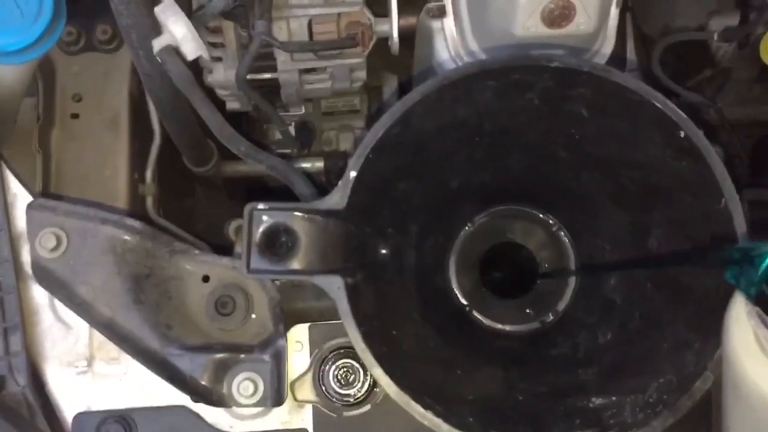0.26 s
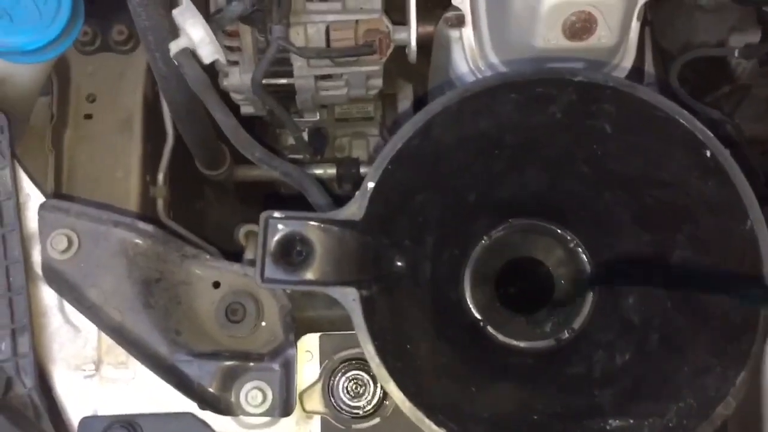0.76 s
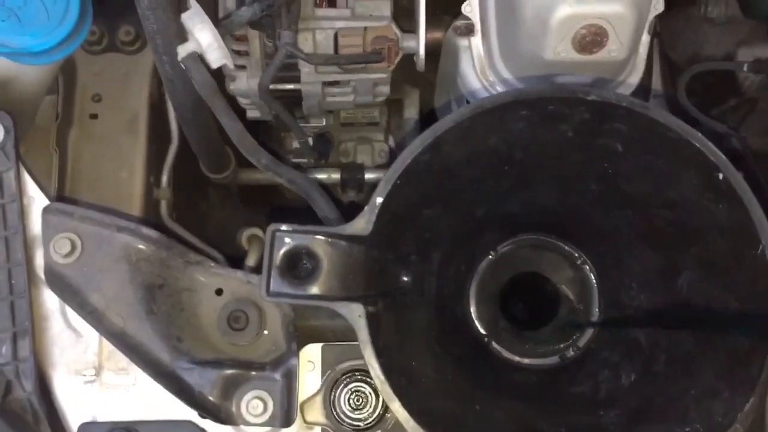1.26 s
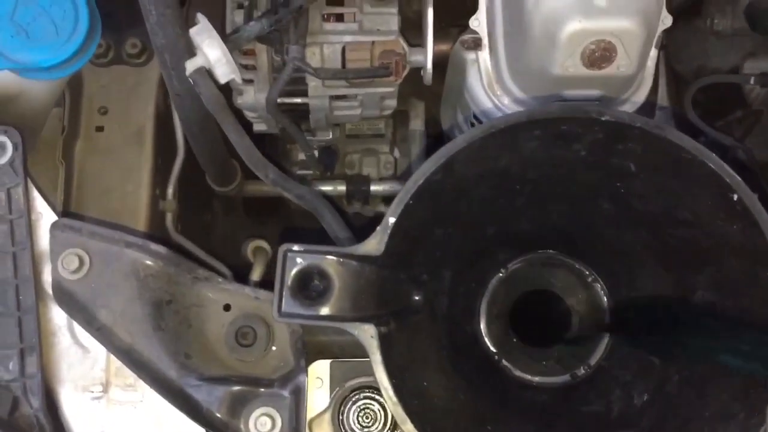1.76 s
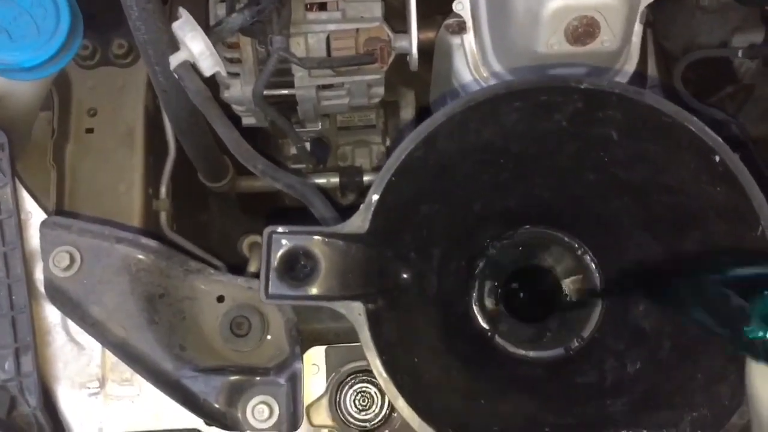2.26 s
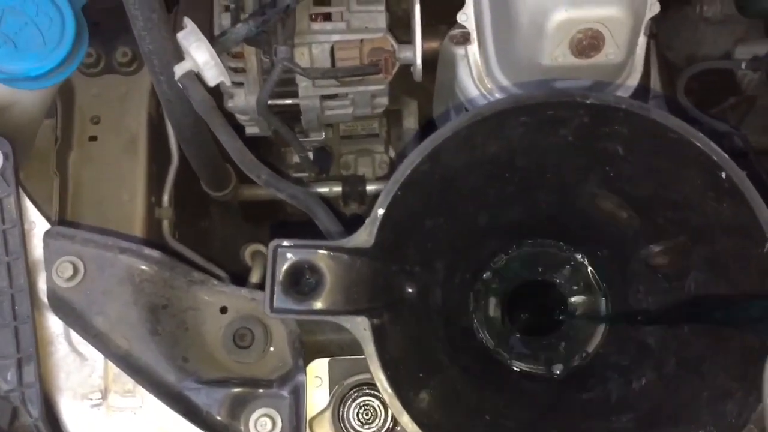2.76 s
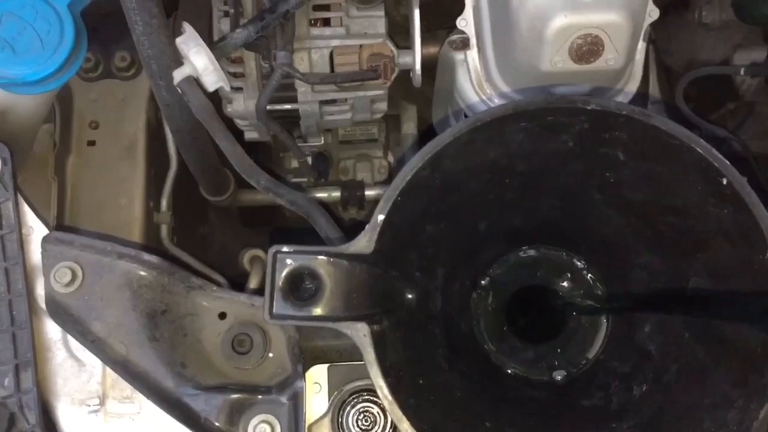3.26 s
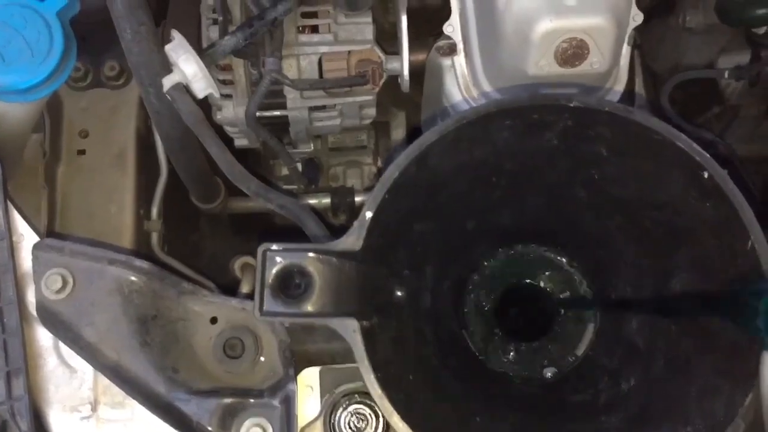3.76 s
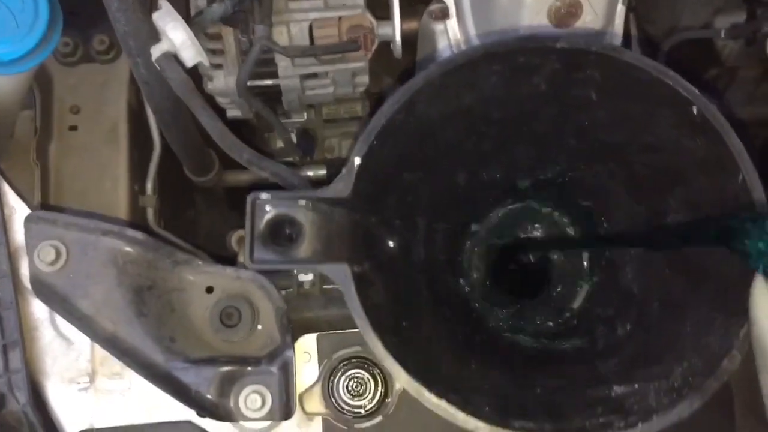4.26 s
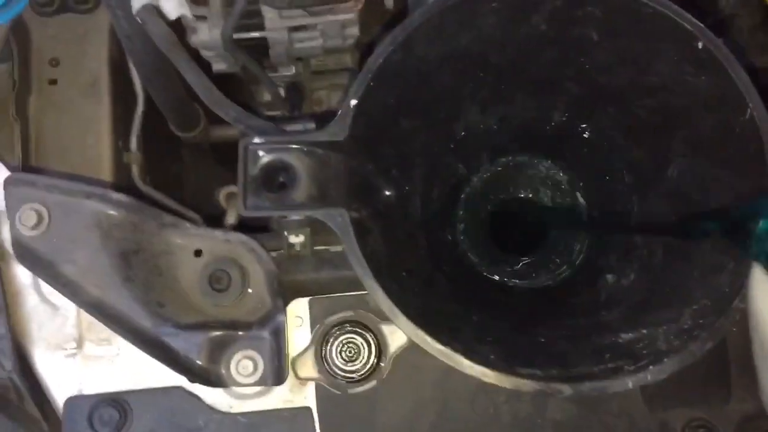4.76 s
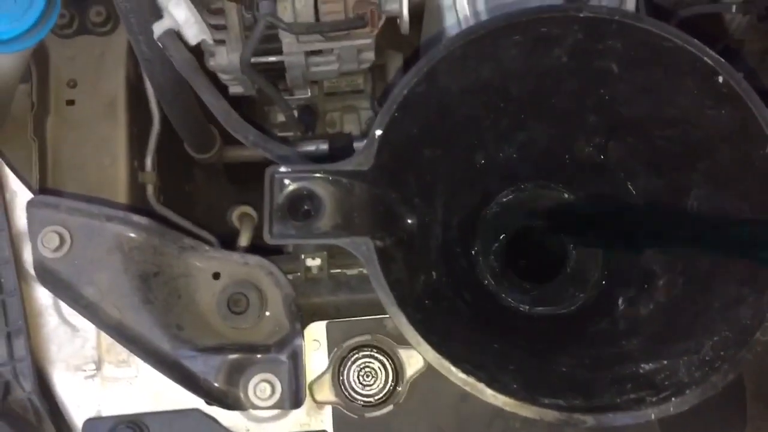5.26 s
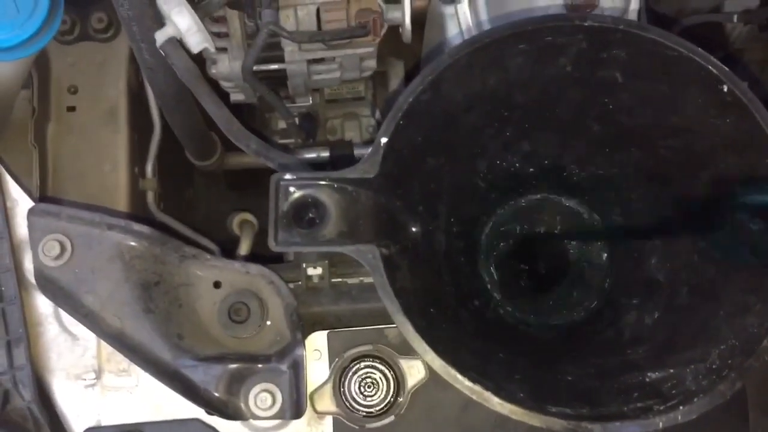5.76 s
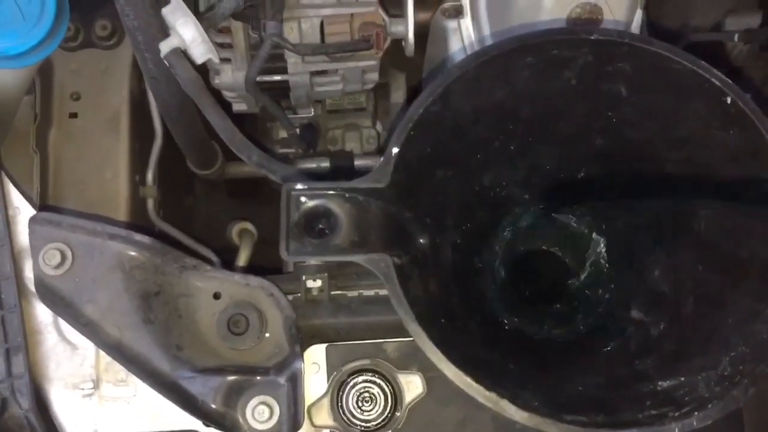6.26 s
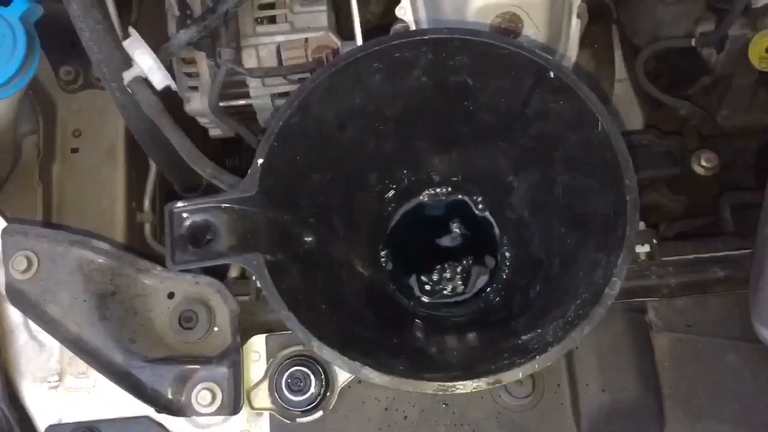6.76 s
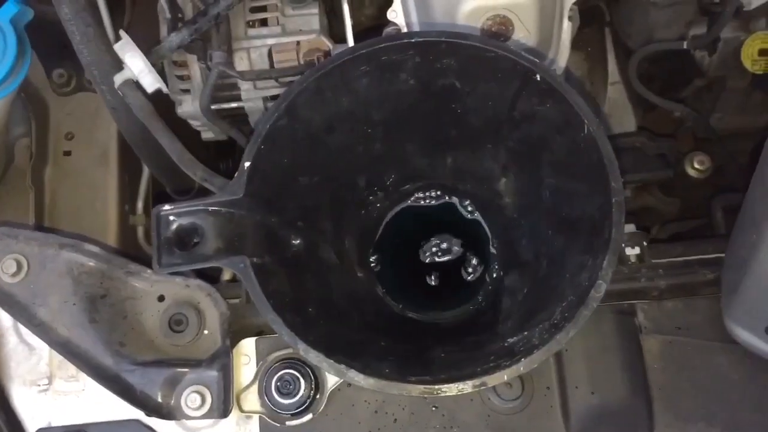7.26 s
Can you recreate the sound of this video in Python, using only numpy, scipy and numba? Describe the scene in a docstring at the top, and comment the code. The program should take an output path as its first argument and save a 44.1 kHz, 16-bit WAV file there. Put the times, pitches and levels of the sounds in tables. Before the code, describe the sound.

From 0 s, coolant runs from a jug into a plastic funnel, close to the microphone, in short irregular gushes several times a second. Clear bubbles plop and ring in the middle-high range, sharp droplets tick on the cone and fine froth crackles; brief lulls near 0.3 and 1.1 s expose faint hiss and a soft low outdoor rumble. From about 1.3 s the flow becomes fuller, with stronger glugs and dull slaps. Between 2.1 and 3.2 s a few deep, muffled thumps of air enter the jug. From 4 to 6.3 s bubbles crowd together, gurgling continuously with more fizzy spray. A quick flurry of loud plops comes at 6.6 s, then pouring stops abruptly at 6.7 s. The rumble instantly becomes louder, steady and droning, with a faint wavering murmur and tiny high foam pops until about 7.5 s.

```python
"""Coolant glugs from a jug into a plastic funnel on a radiator neck, in many short gushes each second.
From the start, trapped air rings as big bubbles, droplets tick on the cone and fine froth crackles; slaps join
in, and after two seconds a few dull thumps of air enter the jug. A low outdoor rumble lies underneath.
At 6.711 s the pouring stops, the rumble is at once louder and a few bubbles of foam burst.
Bubbles are swelling and fading sines, which the funnel colours; hiss and rumble are shaped noise."""
import sys
import numpy as np
from scipy import signal
from scipy.fft import rfft, irfft, next_fast_len
from scipy.io import wavfile
from numba import njit

SR = 44100
rng = np.random.default_rng(int(sys.argv[2]) if len(sys.argv) > 2 else 0)


def transcribe(signal):
    """Save signal, clipped to [-1, 1], as a 16-bit WAV file at the path in sys.argv[1]."""
    frames = np.atleast_2d(signal).T
    limited = np.clip(frames, -1, 1)
    pcm = np.round(limited * 32767).astype(np.int16)
    wavfile.write(sys.argv[1], SR, pcm)


N = 331632
POUR_STOPS_S = 6.711


def from_db(db):
    """Turn a level in dB into a gain."""
    return 10 ** (np.asarray(db) / 20)


def rms_one(x):
    """Scale a sound to an average (rms) level of 1."""
    return x / np.sqrt(np.mean(x ** 2) + 1e-20)


def in_time(rows):
    """Read each column of a time table at every sample."""
    s, *columns = np.transpose(rows)
    t = np.arange(N) / SR
    return [np.interp(t, s, column) for column in columns]


def at_hz(points, hz):
    """Read a spectrum in dB at any pitch, with straight lines on a log-frequency axis."""
    point_hz, point_db = np.transpose(points)
    return np.interp(np.log(hz), np.log(point_hz), point_db)


def drift(rate_hz):
    """Slow random wandering of rms 1: noise smoothed by two equal low-pass poles at rate_hz."""
    step = 40   # samples between the values drawn
    r = np.exp(-2 * np.pi * rate_hz * step / SR)
    noise = rng.standard_normal(N // step + 2002)
    slow = signal.lfilter([1], [1, -2 * r, r * r], noise)[2000:]   # skip the filter's start
    return np.interp(np.arange(N) / step, np.arange(len(slow)), rms_one(slow))


def resonance(x, hz, width_hz):
    """Two-pole resonance that favours one pitch, with a gain of about 1 at its peak."""
    r = np.exp(-np.pi * width_hz / SR)
    top = np.array([1, 0, -1]) * (1 - r * r) / 2
    return signal.lfilter(top, [1, -2 * r * np.cos(2 * np.pi * hz / SR), r * r], x)


def twice_resonant(x, hz, width_hz):
    """Noise passed twice through one resonance, for steeper sides; rms 1."""
    return rms_one(resonance(resonance(x, hz, width_hz), hz, width_hz))


def coloured_noise(spectrum):
    """Steady noise whose frequencies are weighted by a spectrum, rms 1."""
    size = next_fast_len(N)
    hz = np.maximum(np.arange(size // 2 + 1) * SR / size, 1)
    white = rfft(rng.standard_normal(size))
    return rms_one(irfft(white * from_db(at_hz(spectrum, hz)), size)[:N])


@njit
def bubbles(size, rate, at_s, height, hz, swell_s, t60, rise):
    """Sines that swell, then fade by 60 dB in t60 seconds; rise is the share of pitch gained per cycle."""
    out = np.zeros(size)
    for k in range(len(at_s)):
        start = int(at_s[k] * rate)
        phase = 0.
        pitch = hz[k] / rate   # cycles per sample
        swell = max(swell_s[k] * rate, 1.)
        fade = t60[k] * rate
        for i in range(min(int(swell + fade), size - start)):
            if i < swell:
                shape = np.sin(np.pi / 2 * i / swell) ** 2
            else:
                shape = 10 ** (-3 * (i - swell) / fade)
            out[start + i] += height[k] * shape * np.sin(2 * np.pi * phase)
            phase += pitch
            pitch = min(pitch * (1 + rise * pitch), .45)
    return out


# Gushes from the jug. Each row: start in seconds, rise in seconds, fall in seconds, then the crest levels
# in dB, before the funnel, of gurgle in the neck, spatter on the cone and fine spray.
GUSH_TABLE = [(0.005, 0.013, 0.027, -41.5, -38.5, -47), (0.132, 0.036, 0.03, -39.5, -39.5, -55),
              (0.31, 0.015, 0.028, -54, -47.5, -56), (0.39, 0.045, 0.029, -50.5, -44, -50),
              (0.612, 0.029, 0.037, -48.5, -33, -48), (0.658, 0.019, 0.074, -35, -31.5, -45.5),
              (0.84, 0.032, 0.012, -54, -34, -49), (0.964, 0.047, 0.04, -39.5, -30, -46),
              (1.1, 0.062, 0.079, -63, -59.5, -71), (1.282, 0.078, 0.02, -32, -35.5, -45.5),
              (1.458, 0.053, 0.024, -52, -54.5, -69), (1.53, 0.025, 0.021, -37.5, -43, -59),
              (1.632, 0.021, 0.051, -33, -29.5, -49), (1.679, 0.026, 0.047, -34, -35, -50),
              (1.852, 0.044, 0.026, -43.5, -36, -46.5), (1.962, 0.054, 0.085, -34, -35, -46.5),
              (2.202, 0.097, 0.053, -36.5, -31.5, -50), (2.309, 0.014, 0.089, -34, -36, -54),
              (2.41, 0.02, 0.012, -39, -42, -64), (2.46, 0.11, 0.08, -38.5, -35.5, -56),
              (2.579, 0.032, 0.058, -32, -33.5, -46), (2.762, 0.068, 0.04, -37, -33.5, -54),
              (2.828, 0.029, 0.092, -28.5, -30, -44), (3.039, 0.026, 0.021, -33, -29.5, -47),
              (3.162, 0.07, 0.059, -34.5, -34, -53.5), (3.345, 0.015, 0.008, -51.5, -49, -75),
              (3.379, 0.041, 0.065, -38, -39.5, -58), (3.47, 0.065, 0.038, -35, -38, -55),
              (3.625, 0.071, 0.037, -36.5, -31.5, -47), (3.73, 0.032, 0.026, -37, -37.5, -61),
              (3.82, 0.009, 0.011, -56, -58, -57), (3.85, 0.085, 0.082, -33.5, -34, -53),
              (4.042, 0.044, 0.015, -35.5, -32, -52), (4.11, 0.026, 0.061, -34.5, -31.5, -49),
              (4.21, 0.031, 0.028, -39, -34.5, -49), (4.28, 0.069, 0.063, -41, -39, -45),
              (4.398, 0.028, 0.11, -35.5, -35.5, -46.5), (4.561, 0.019, 0.12, -37.5, -34.5, -49),
              (4.67, 0.037, 0.11, -35, -37.5, -47.5), (4.81, 0.011, 0.024, -41, -42.5, -53),
              (4.858, 0.08, 0.074, -33, -36.5, -44), (5.087, 0.019, 0.055, -32.5, -33, -39),
              (5.2, 0.049, 0.031, -39.5, -47, -54), (5.278, 0.036, 0.13, -36.5, -38, -51),
              (5.439, 0.07, 0.059, -34, -34.5, -53), (5.57, 0.019, 0.076, -40.5, -44.5, -45.5),
              (5.659, 0.083, 0.043, -35, -36, -44.5), (5.82, 0.08, 0.029, -38.5, -38, -39.5),
              (5.878, 0.018, 0.053, -32, -37, -51), (5.991, 0.036, 0.021, -36, -47, -49),
              (6.059, 0.015, 0.038, -36, -34.5, -40), (6.14, 0.037, 0.1, -47, -45.5, -50),
              (6.259, 0.024, 0.093, -42, -44.5, -55), (6.389, 0.015, 0.014, -44, -45, -38),
              (6.458, 0.015, 0.01, -40, -35.5, -39), (6.51, 0.032, 0.03, -38, -47, -52),
              (6.602, 0.0089, 0.0083, -42, -43, -47), (6.638, 0.016, 0.048, -37.5, -37, -43)]


def gushes():
    """Levels of gurgle, spatter and spray: each gush sets in steeply, arches over its crest and drains away."""
    arch_db = 6.5   # how much weaker a gush is at its ends than at its crest
    onset_db_per_s, tail_db_per_s = 1506, 500   # slopes before its start and after its end
    t = np.arange(0, N, 40) / SR
    start, rise, fall, *levels_db = np.transpose(GUSH_TABLE)[:, :, None]
    crest = start + rise
    off_crest = np.clip(np.maximum((crest - t) / rise, (t - crest) / fall), 0, 1)
    before_db = onset_db_per_s * np.maximum(start - t, 0)
    after_db = tail_db_per_s * np.maximum(t - crest - fall, 0)
    shape_db = -arch_db * off_crest ** 2 - before_db - after_db - 99 * (t > POUR_STOPS_S)
    # where gushes overlap, the strongest one sets the level
    return [np.interp(np.arange(N) / SR, t, np.max(db + shape_db, axis=0)) for db in levels_db]


def froth(spectrum, per_s, cycles, spread_db, clumps_db, rise):
    """Small bubbles at random moments, a few louder than the rest, louder inside clumps; rms 1."""
    draw = rng.random((24000, 5))
    draw = draw[draw[:, 4] < per_s * N / SR / len(draw)]
    at_s = draw[:, 1] * N / SR
    sample = (draw[:, 1] * N).astype(int)
    lowest_hz, highest_hz = spectrum[0][0], spectrum[-1][0]
    hz = lowest_hz * (highest_hz / lowest_hz) ** draw[:, 0]
    hz = hz * (1 + .07 * np.tanh(drift(9)))[sample]   # the air space left in the neck keeps changing
    size_db = spread_db * np.minimum(-np.log(draw[:, 2] + 1e-9), 3.5) + clumps_db[sample]
    t60 = cycles * (0.8 + 1.65 * draw[:, 3]) / hz
    return rms_one(bubbles(N, SR, at_s, from_db(size_db + at_hz(spectrum, hz)), hz, 1.51 / hz, t60, rise))


# Bubble strength by pitch for each froth. Each row: pitch in Hz, relative level in dB.
GURGLE_SPECTRUM = [(540, -35.5), (680, -21), (850, -18.5), (1250, -29), (1550, -6), (1750, 3), (2070, 11),
                   (2500, -1.5), (3200, -32)]
SPATTER_SPECTRUM = [(3200, -15.5), (4300, -7.5), (5600, -0.5), (6900, -7.5), (8500, -7), (10000, -25)]
SPRAY_SPECTRUM = [(10200, -8), (11500, -9.5), (14000, -8), (16500, -3)]
# Faint steady microphone hiss, heard between gushes. Each row: frequency in Hz, relative level in dB per Hz.
HISS_SPECTRUM = [(500, -38), (4000, 7), (9000, 0), (16500, -3)]


def stream():
    """Three sizes of froth, ringing droplets and dull gulps swell with each gush, over a steady hiss."""
    gurgle_db, spatter_db, spray_db = gushes()
    clumps = drift(74)   # as the stream breaks up, all but the ringing droplets clump together
    gurgle = froth(GURGLE_SPECTRUM, 1300, cycles=14.7, spread_db=3.5, clumps_db=1.5 * clumps, rise=0.0029)
    spatter = froth(SPATTER_SPECTRUM, 1500, cycles=16.2, spread_db=5.5, clumps_db=4.3 * clumps, rise=0.016)
    spray = froth(SPRAY_SPECTRUM, 1600, cycles=14, spread_db=8.5, clumps_db=4.3 * clumps, rise=.003)
    droplets = froth([(1600, -4), (3200, 0), (6500, -4)], 90,
                     cycles=50, spread_db=3.5, clumps_db=np.zeros(N), rise=.007)
    gulps = froth([(450, -2), (650, -2.5), (900, -3)], 45,
                  cycles=2.3, spread_db=5.5, clumps_db=1.5 * clumps, rise=.01)
    # this layer of hiss lasts until the louder rumble begins
    hiss = from_db(-79) * coloured_noise(HISS_SPECTRUM) * (np.arange(N) < POUR_STOPS_S * SR)
    out = from_db(gurgle_db) * gurgle + from_db(spatter_db) * spatter + from_db(spray_db) * spray
    return out + from_db(gurgle_db - 8) * droplets + from_db(gurgle_db - 23.5) * gulps + hiss


# Big bubbles closing in the neck. Each row: start in seconds, level in dB before the funnel,
# starting pitch in Hz.
GLUG_TABLE = [(.0246, -22.5, 1960), (.1314, -31.5, 1930), (.687, -19, 1850), (.79, -33, 2220),
              (.8735, -19, 2120), (1.0039, -13.5, 2110), (1.1286, -31, 2020), (1.287, -39, 1860),
              (1.3095, -19, 2060), (1.3208, -8, 2200), (1.3702, -19.5, 1880), (1.5368, -19.5, 1990),
              (1.5564, -17, 2030), (1.5864, -31, 2160), (1.6414, -20, 1860), (1.6528, -30, 1900),
              (1.7408, -21, 1840), (1.97, -18.5, 2010), (2.0227, -12.5, 2280), (2.0532, -13, 2180),
              (2.077, -16, 2500), (2.2062, -21, 1960), (2.2794, -16, 2100), (2.3868, -18.5, 1800),
              (2.761, -27, 1800), (2.8892, -5.5, 2320), (2.9394, -17.5, 1750), (2.9596, -15, 1920),
              (3.2285, -6, 2290), (3.4488, -17, 2690), (3.484, -18.5, 1840), (3.6938, -13.5, 2600),
              (3.8957, -13.5, 2210), (4.123, -19, 2030), (4.1365, -2, 2170), (4.1816, -13, 3050),
              (4.248, -21.5, 2100), (4.291, -22, 1860), (4.2994, -17.5, 1900), (4.3238, -9.5, 2060),
              (4.3356, -16.5, 1770), (4.3622, -22, 1950), (4.4037, -19, 2020), (4.4268, -14.5, 2170),
              (4.516, -17.5, 2020), (4.5628, -11, 1960), (4.5775, -19, 1960), (4.654, -20, 2360),
              (4.66, -19, 1970), (4.6854, -8, 2240), (4.7332, -17.5, 1960), (4.9273, -16.5, 2170),
              (4.9717, -18, 1770), (5.1346, -13, 2650), (5.158, -20.5, 1620), (5.231, -36, 850),
              (5.3219, -18.5, 1930), (5.4453, -17, 2020), (5.5111, -9, 2330), (5.5933, -19.5, 1820),
              (5.6913, -18, 1760), (5.7014, -4, 1930), (5.713, -13, 1920), (5.7513, -14, 2030),
              (5.7635, -12.5, 2210), (5.784, -16.5, 2210), (5.8875, -10, 2200), (5.8942, -12, 3030),
              (5.946, -11.5, 2340), (6.0798, -15.5, 2080), (6.085, -36, 805), (6.1352, -13, 2120),
              (6.2721, -14.5, 2280), (6.292, -4, 1825), (6.474, -21, 1870), (6.489, -40, 1160),
              (6.5, -35, 1060), (6.517, -20.5, 763), (6.5225, -21, 920), (6.527, -18, 1050),
              (6.6136, -17, 2130), (6.647, -7.5, 2220), (6.6646, 0.5, 2190), (6.6756, -16, 2330)]


def glugs():
    """Each big bubble rings at its own pitch for a like number of cycles; weaker ones close faster."""
    s, db, hz = np.transpose(GLUG_TABLE)
    swell_cycles = np.maximum(2.83 + 0.06 * db, .5)
    ring_cycles = 11
    return bubbles(N, SR, s, from_db(db), hz, swell_cycles / hz, ring_cycles / hz, 0.0055)


# Slugs of liquid slapping into the neck. Each row: start in seconds, level in dB before the funnel,
# pitch in Hz.
SLAP_TABLE = [(1.286, -48, 877), (1.341, -27, 950), (1.639, -41, 856), (1.967, -50, 999), (1.979, -44, 896),
              (2.386, -38, 867), (2.54, -35, 829), (2.878, -35, 790), (2.895, -32, 816),
              (2.938, -26.5, 850), (3.257, -32.5, 820), (3.637, -30.5, 990), (3.929, -29, 937),
              (3.99, -39, 805), (4.298, -34, 869), (4.323, -29, 950), (4.426, -28, 813), (4.501, -37, 907),
              (4.563, -32, 813), (4.734, -34, 826), (4.772, -31, 937), (4.971, -34, 867), (5.093, -33, 988),
              (5.229, -36, 818), (5.307, -32, 875), (5.392, -33, 870), (5.678, -35, 910), (5.691, -36, 864),
              (6.08, -33, 810), (6.294, -43, 999)]


def slaps():
    """Dull, broad knocks: low sines that die within a few cycles."""
    s, db, hz = np.transpose(SLAP_TABLE)
    swell_cycles, ring_cycles = 0.69, 5.8
    return bubbles(N, SR, s, from_db(db), hz, swell_cycles / hz, ring_cycles / hz, 0.)


# Droplets striking the cone. Each row: start in seconds, level in dB before the funnel,
# starting pitch in Hz, level of the crack in dB before the funnel.
DROP_TABLE = [(.0091, -13.5, 6000, -53), (0.026, -10, 5970, -39), (.1588, -15, 6840, -23),
              (0.3223, -19, 6500, -42), (0.3476, -26, 5100, -60), (0.399, -26, 7000, -47),
              (0.4212, -20, 6800, -45), (.622, -12, 6230, -42), (0.6318, -16, 6340, -34),
              (0.6775, -5, 5600, -36), (0.686, -4.5, 5470, -31), (0.72, -12.5, 6200, -30),
              (.784, -27, 5160, -57), (0.862, -16.5, 6300, -49), (.9673, -19, 6440, -44),
              (0.976, -14.5, 6460, -43), (1.0237, -10.5, 6160, -36), (1.2064, -31, 7460, -36),
              (1.311, -13, 5150, -42), (1.3342, -7.5, 6080, -40), (1.3737, -10.5, 6300, -41),
              (1.5166, -25, 6460, -47), (1.5367, -11, 6030, -52), (1.5547, -11.5, 6340, -22),
              (1.639, -10.5, 7000, -40), (1.6473, -9.5, 5970, -25), (1.7088, -9.5, 6000, -46),
              (1.858, -22, 5630, -58), (1.919, -17.5, 8360, -28), (1.9661, -14, 7060, -38),
              (2.042, -8, 5870, -36), (2.1684, -36, 5730, -65), (2.2073, -12.5, 5500, -27),
              (2.2796, -10, 6040, -19), (2.327, -9.5, 5230, -23), (2.5033, -17, 6540, -31),
              (2.5499, -5, 6150, -40), (2.5625, -16, 4940, -44), (2.5951, -21, 5970, -41),
              (2.609, -15, 5430, -38), (2.615, -17, 5900, -35), (2.6427, -19, 6200, -19),
              (2.6987, -39, 5820, -60), (2.863, -12, 6170, -16), (3.0143, -34, 6500, -57),
              (3.058, -23, 5760, -30), (3.228, -10.5, 5000, -35), (3.5474, -15, 5200, -47),
              (3.6284, -15.5, 5900, -22), (3.677, -3.5, 5630, -31), (3.76, -18, 5900, -24),
              (3.822, -14.5, 4930, -57), (3.9039, -10.5, 6100, -42), (3.9685, -9, 4920, -24),
              (4.0839, -15, 7740, -20), (4.1144, -12, 6300, -39), (4.286, -14.5, 4660, -47),
              (4.324, -16.5, 5300, -32), (4.449, -12, 4960, -38), (4.6042, -12, 4230, -25),
              (4.69, -17, 5540, -38), (4.8897, -13, 5660, -24), (4.9134, -16, 5500, -16),
              (4.972, -16.5, 5400, -23), (5.3083, -15, 4650, -43), (5.4988, -15, 6950, -25),
              (5.5104, -13, 5400, -12), (5.6913, -13.5, 4130, -26), (5.852, -14, 8040, -21),
              (5.8942, -12.5, 4260, -10), (5.9123, -13, 8000, -15), (6.0674, -11.5, 5470, -43),
              (6.096, -19, 8800, -18), (6.1515, -15.5, 5800, -37), (6.2919, -11.5, 5730, -20.5),
              (6.4, -15.5, 5970, -13.5), (6.4635, -16.5, 4600, -17), (6.5237, -25, 5240, -24),
              (6.647, -12.5, 6540, -18), (6.6573, -14.5, 8000, -32), (6.665, -15, 5450, -31),
              (6.7073, -24, 6850, -39)]


def drops():
    """A droplet gives a short bright crack, a small bubble of rising pitch and two weaker neighbours."""
    s, db, hz, crack_db = np.transpose(DROP_TABLE)
    swell, t60 = np.full(len(s), 0.00066), np.full(len(s), 0.0013)   # seconds
    draw = rng.random((len(s), 3))
    main = bubbles(N, SR, s, from_db(db), hz, swell, t60, 0.012)
    lower_s, lower_hz = s + 0.0012 * draw[:, 1], hz * (0.7 + 0.23 * draw[:, 0])
    lower = bubbles(N, SR, lower_s, from_db(db - 2.0), lower_hz, swell, t60, 0.014)
    upper_s, upper_hz = s + 0.00056 * draw[:, 0], hz * (1.035 + 0.51 * draw[:, 1])
    upper = bubbles(N, SR, upper_s, from_db(db - 9.0), upper_hz, swell, t60, 0.0058)
    crack_hz, crack_t60 = 11000 + 4500 * draw[:, 2], np.full(len(s), 0.0017)
    crack = bubbles(N, SR, s + swell / 2, from_db(crack_db), crack_hz, swell / 2, crack_t60, 0.)
    return main + lower + upper + crack


# Lone bubbles that ring on clearly. Each row: start in seconds, level in dB before the funnel,
# starting pitch in Hz, seconds to fade by 60 dB, share of pitch gained per cycle (negative falls).
PING_TABLE = [(0.377, -43, 3320, 0.022, 0.011), (0.4578, -24.5, 1990, 0.03, 0.0032),
              (0.914, -46, 2050.0, 0.025, -0.0032), (1.112, -45, 2780, 0.022, -0.0016),
              (1.1543, -39, 3330, 0.019, -0.0031), (1.238, -39, 4140, 0.016, 0.0011),
              (1.4953, -33, 4430, 0.023, -0.0016), (1.5366, -15, 3810, 0.0096, 0.00047),
              (1.8425, -41, 1520, 0.077, 0.004), (2.342, -20, 2580.0, 0.024, 0.0049),
              (3.261, -26.5, 2220, 0.068, 0.00012), (3.2862, -29, 1930, 0.047, 0.0095),
              (3.4168, -22.5, 5880, 0.025, -0.0061), (3.547, -22, 1760, 0.025, 0.019),
              (3.6523, -21.5, 4230, 0.023, -0.02), (4.4486, -25, 1845, 0.047, 0.0014),
              (4.712, -24, 5250.0, 0.018, 0.0003), (4.798, -23.5, 1970, 0.054, 0.0017),
              (5.1335, -24, 3230, 0.031, 0.003), (5.1415, -22, 1680.0, 0.021, -0.019),
              (5.294, -31, 5620, 0.025, 0.0035), (5.5413, -26, 3220, 0.023, 0.0019),
              (5.716, -26, 2720, 0.053, 0.032), (5.734, -27.5, 1260, 0.086, 0.011),
              (5.943, -23, 1370, 0.078, 0.0095), (6.151, 2.5, 1940, .02, 0.011),
              (6.478, -43, 1630, 0.057, -0.012), (6.536, -45, 1240, 0.053, -0.0009),
              (6.5694, -24, 1890, 0.014, 0.0046), (6.6027, -13, 2014, 0.016, .006)]


def pings():
    """Clear bubbles, each a sine with a fade and a glide of its own."""
    out = np.zeros(N)
    size = int(.1 * SR)
    swell_s = np.array([.0018])
    for s, db, hz, t60, rise in PING_TABLE:
        start = int(s * SR)
        ping = bubbles(size, SR, np.zeros(1), from_db([db]), np.array([hz]), swell_s, np.array([t60]), rise)
        out[start:start + size] += ping
    return out


# Air modes of the cone. Each row: pitch in Hz, width in Hz, gain in dB.
FUNNEL_MODES = [(878, 97, 2.5), (2210, 79, -43), (5580, 300, -4)]


def funnel(x):
    """The cone's air modes ring on after every bubble, and its walls give a short diffuse echo."""
    modes = 0
    for k, (hz, width, db) in enumerate(FUNNEL_MODES):
        modes = modes + from_db(db) * (-1) ** k * resonance(x, hz, width)   # neighbours have opposite sign
    fade = from_db(-60 * np.arange(2600) / SR / 0.039)   # 60 dB in 0.039 s
    decay = rng.standard_normal(2600) * fade
    echo = signal.fftconvolve(x, decay / np.linalg.norm(decay))[:N]
    return x + modes + from_db(-7.5) * echo


# Air gulped into the jug. Each row: start in seconds, level in dB, pitch in Hz, seconds to fade by 60 dB.
THUMP_TABLE = [(2.109, -31.5, 60.4, 0.086), (2.345, -29.5, 68.4, 0.08), (2.845, -26, 141, 0.021),
               (3.154, -38, 112, 0.025), (6.515, -34, 300, 0.022)]


def jug():
    """Dull thumps of air entering the jug: low sines of steady pitch that swell in half a cycle."""
    s, db, hz, t60 = np.transpose(THUMP_TABLE)
    return bubbles(N, SR, s, from_db(db), hz, .5 / hz, t60, 0.)


# Foam bursting on the still surface. Each row: start in seconds, level in dB, starting pitch in Hz.
FOAM_TABLE = [(6.752, -33, 11100), (6.785, -57, 13000), (6.861, -60, 13000), (6.956, -65, 9050),
              (7.06, -57, 8900), (7.07, -55, 6500), (7.111, -63, 12300), (7.222, -48, 9200),
              (7.229, -47, 8160), (7.331, -60, 14200)]


def foam():
    """Tiny bubbles bursting after the pour: very high, short sines."""
    s, db, hz = np.transpose(FOAM_TABLE)
    swell, t60 = np.full(len(s), .0002), np.full(len(s), 0.011)   # seconds
    return bubbles(N, SR, s, from_db(db), hz, swell, t60, 0.0029)


# Rumble during and after the pour. Each row: frequency in Hz, relative level in dB per Hz.
POURING_SPECTRUM = [(20, -41), (40, -27.5), (110, 1), (197, -13.5), (290, -7), (420, -24), (900, -31),
                    (1900, -30.5), (6000, -57.5), (16500, -56)]
AFTER_SPECTRUM = [(20, -38), (34, -21), (52, -1), (135, -5.5), (200, -11.5), (280, -20.5), (385, -24.5),
                  (420, -33), (900, -35), (1700, -35), (2600, -42), (6000, -54.5), (10000, -64.5),
                  (16500, -67.5)]
# Levels while pouring. Each row: time in seconds, middle level of the rumble in dB, of the deep lumps in dB.
POURING_LEVELS = [(0, -52.5, -55), (1.9, -52, -52.5), (2.2, -51.5, -51), (2.9, -51, -46.5),
                  (4.1, -52.5, -54), (5.6, -50, -50.5), (5.9, -55, -60.5), (6.7, -50, -51)]
# Narrow humps in the late rumble. Each row: pitch in Hz, width of each filter pass in Hz, rms level in dB.
DRONE_HUMPS = [(129.2, 5, -39), (177, 11, -55), (213, 5, -48), (278.6, 7.6, -50.5), (377, 7.7, -57.5)]
# Wavering bands in the late rumble. Each row: pitch in Hz, width of each filter pass in Hz,
# middle rms level in dB.
MURMUR_BANDS = [(700, 150, -69), (1120, 200, -66), (1700, 200, -68), (2200, 500, -68)]


def rumble():
    """Outdoor noise, soft and lumpy during the pour, suddenly louder with humps and wavering bands after it."""
    after = np.arange(N) >= POUR_STOPS_S * SR
    rumble_db, lumps_db = in_time(POURING_LEVELS)
    white = rng.standard_normal((2, N))
    early = from_db(rumble_db + 1.0 * drift(3.0)) * coloured_noise(POURING_SPECTRUM)
    early = early + from_db(lumps_db + 2.6 * drift(4.8)) * twice_resonant(white[0], 50, 54)
    late = from_db(-35) * coloured_noise(AFTER_SPECTRUM)
    for hz, width, db in DRONE_HUMPS:
        late = late + from_db(db) * twice_resonant(white[0], hz, width)
    for hz, width, db in MURMUR_BANDS:
        late = late + from_db(db + 3.5 * drift(9)) * twice_resonant(white[1], hz, width)
    return np.where(after, late, early)


def scene():
    """Liquid in the funnel, then foam, with the jug's thumps and the rumble underneath."""
    in_funnel = stream() + glugs() + slaps() + drops() + pings()
    liquid = from_db(-2.0) * funnel(in_funnel) + foam()
    return (liquid + jug() + rumble())[None]


def record(dry):
    """The microphone loses the deepest bass, the loudest bubbles flatten at a ceiling and the top is cut."""
    ceiling, cutoff_hz = 0.83, 16900
    dry = signal.sosfilt(signal.butter(3, 34, "high", fs=SR, output="sos"), dry)
    flattened = dry / (1 + np.abs(dry / ceiling) ** 6) ** (1 / 6)
    return signal.sosfilt(signal.cheby2(12, 60, cutoff_hz, fs=SR, output="sos"), flattened)


dry = scene()
out = record(dry)
transcribe(out)
```